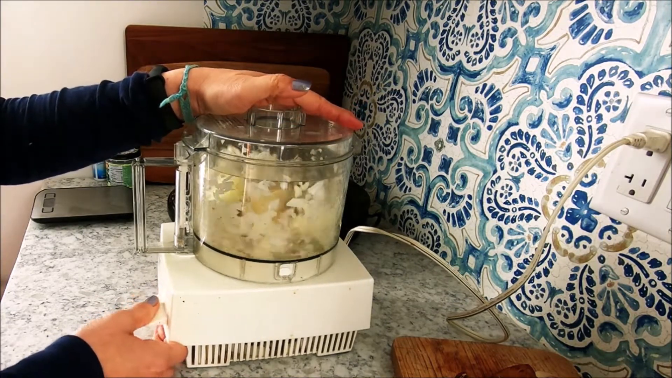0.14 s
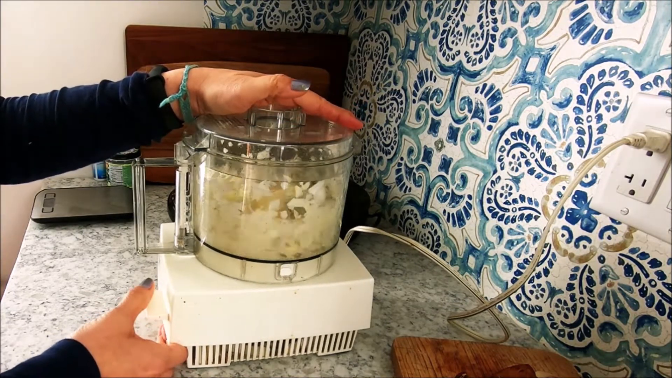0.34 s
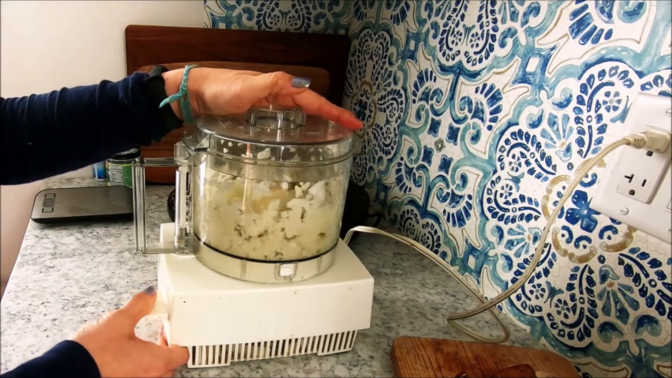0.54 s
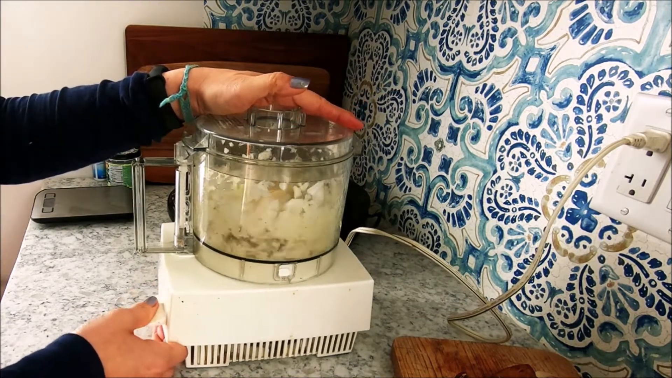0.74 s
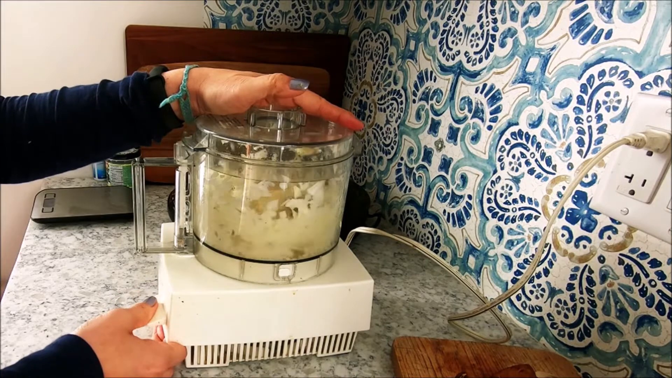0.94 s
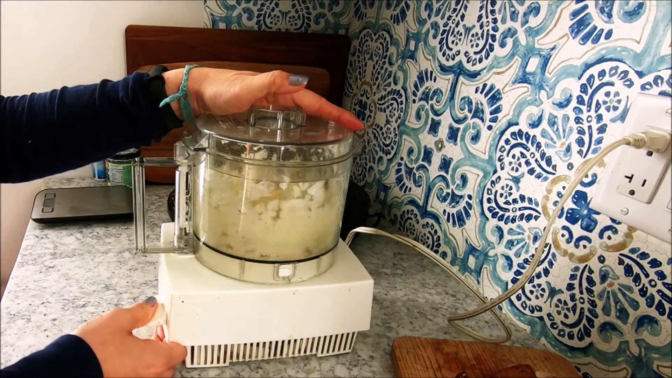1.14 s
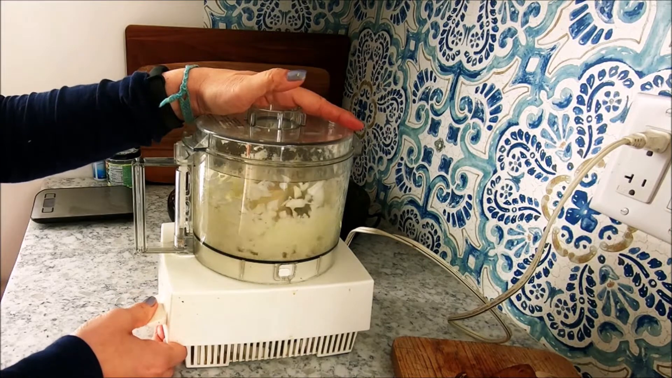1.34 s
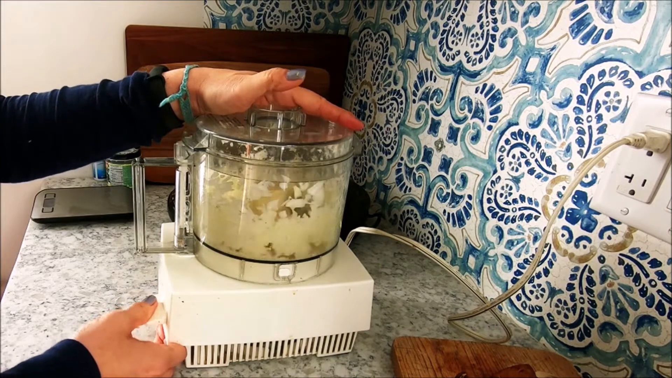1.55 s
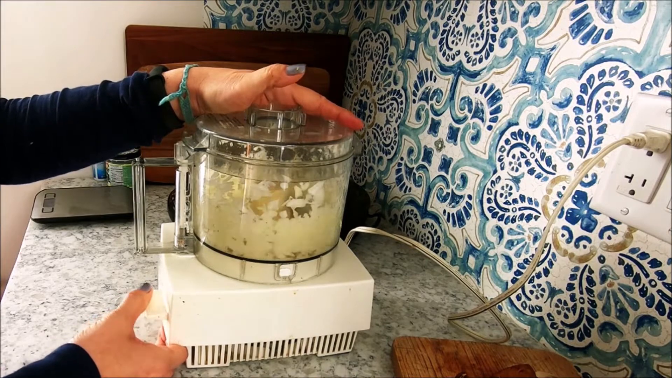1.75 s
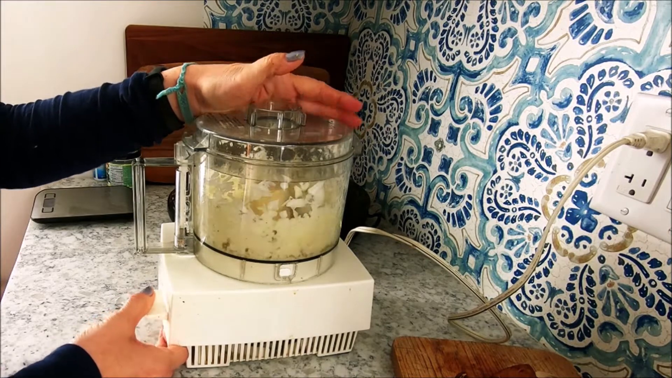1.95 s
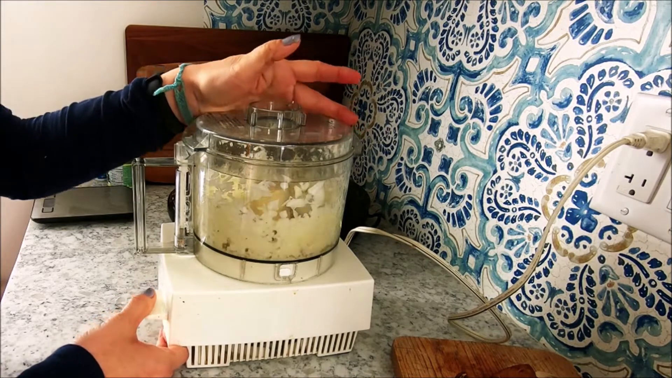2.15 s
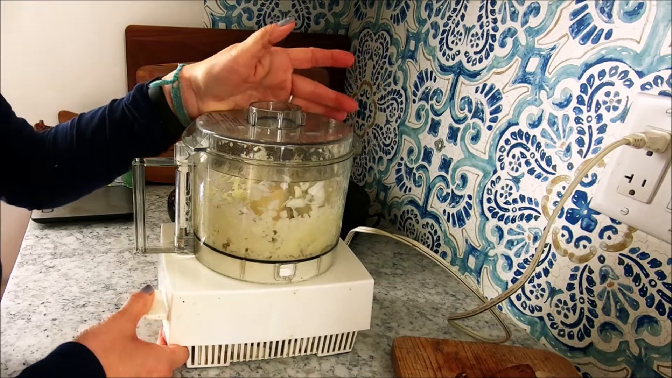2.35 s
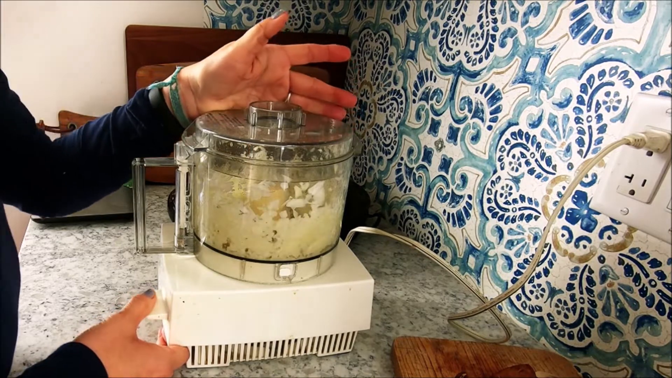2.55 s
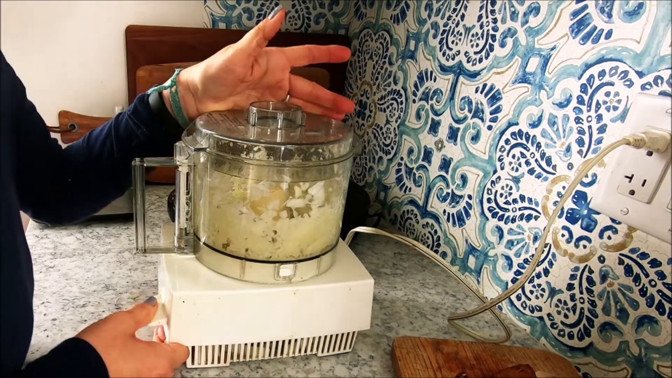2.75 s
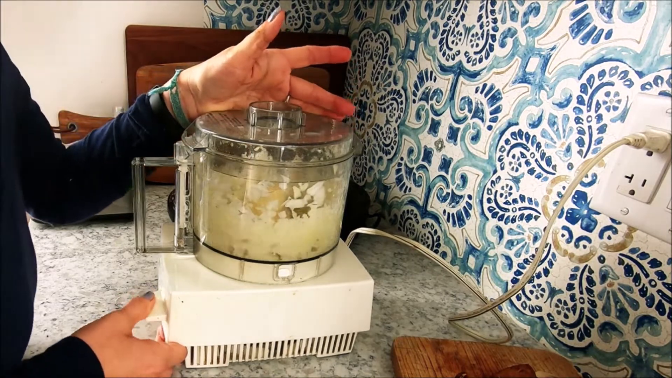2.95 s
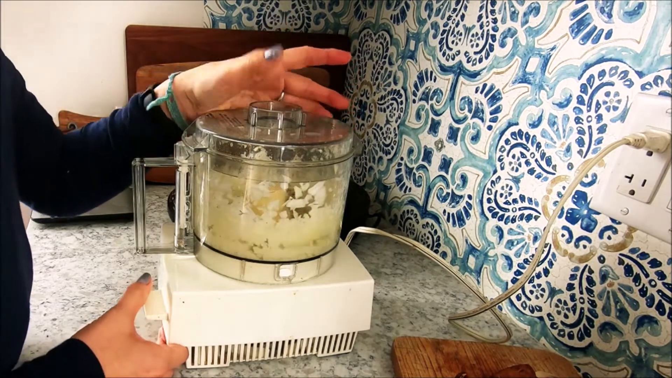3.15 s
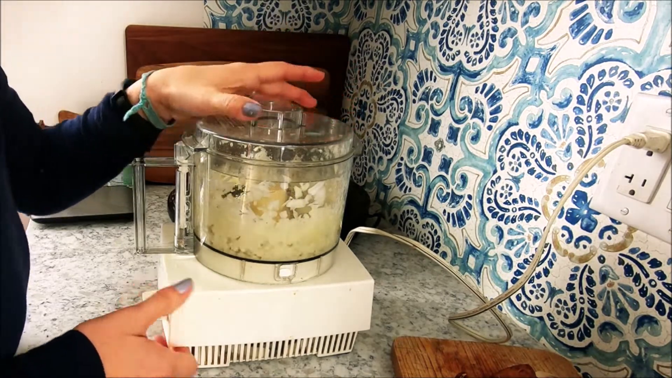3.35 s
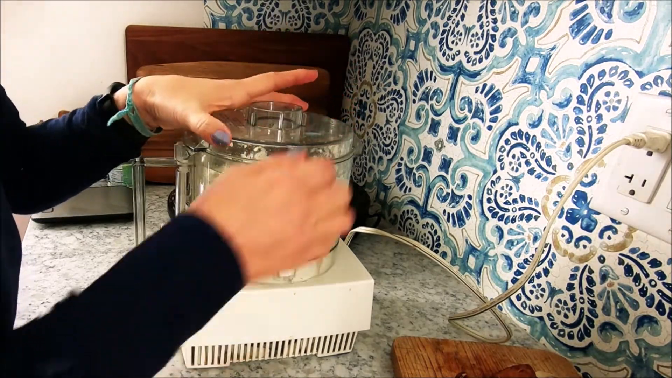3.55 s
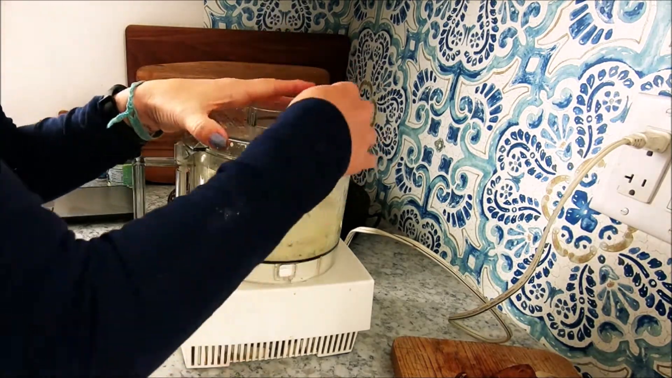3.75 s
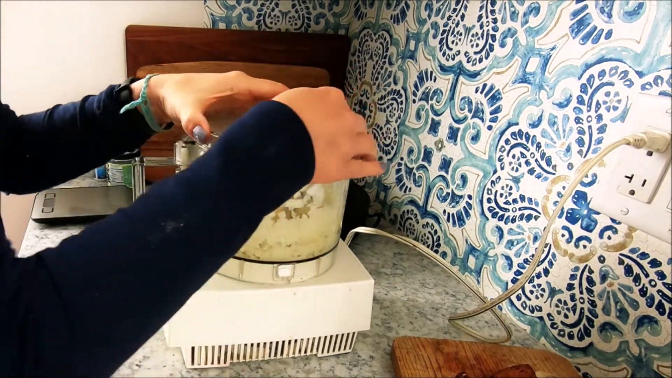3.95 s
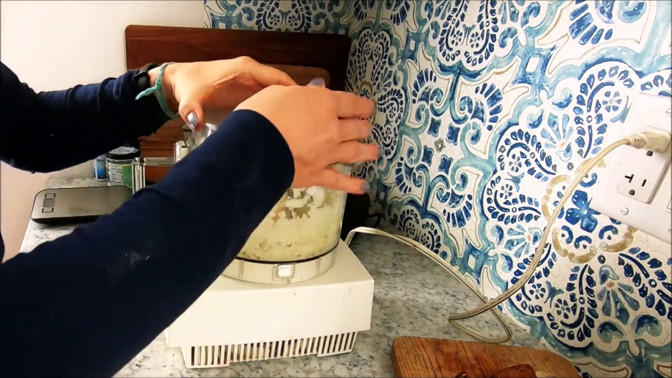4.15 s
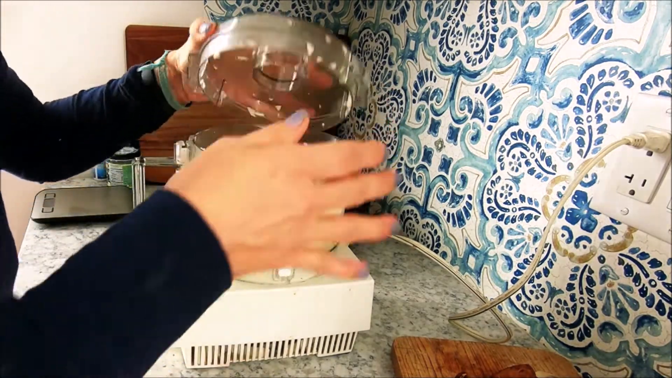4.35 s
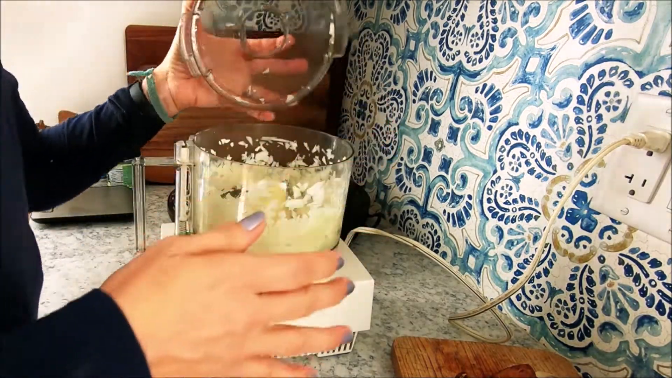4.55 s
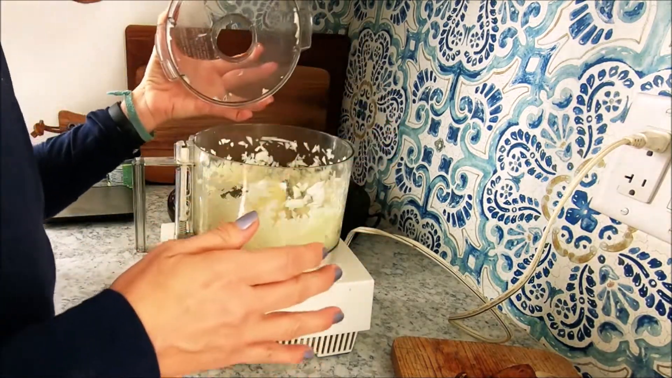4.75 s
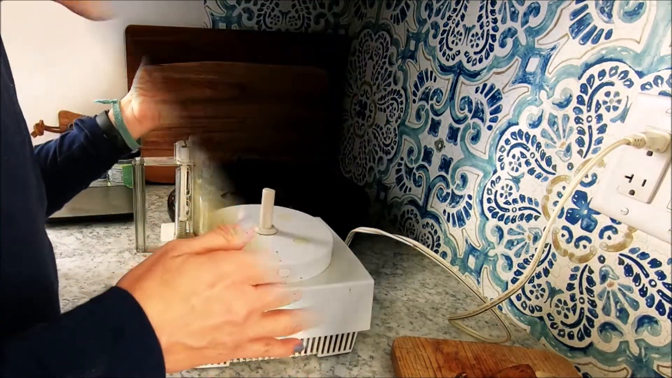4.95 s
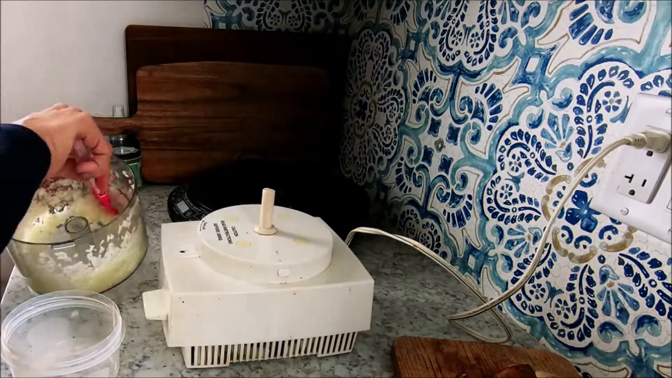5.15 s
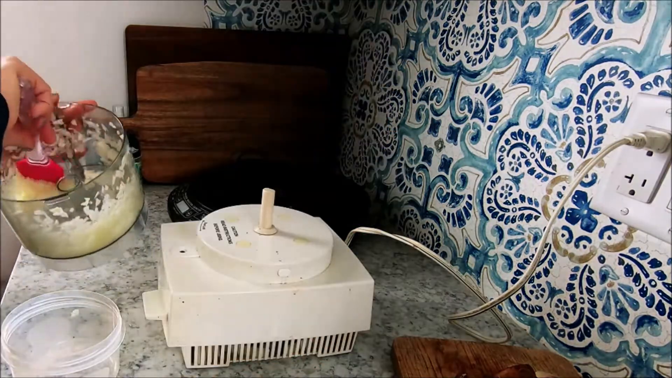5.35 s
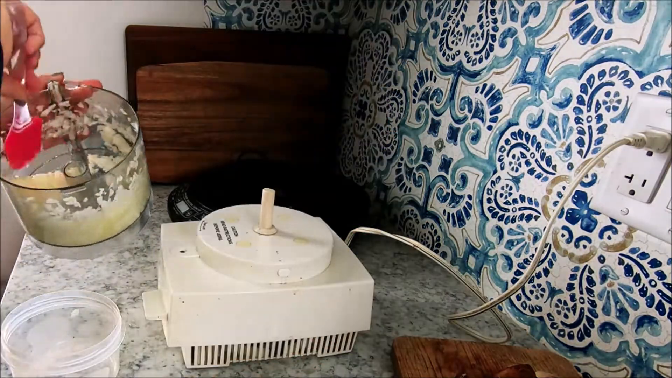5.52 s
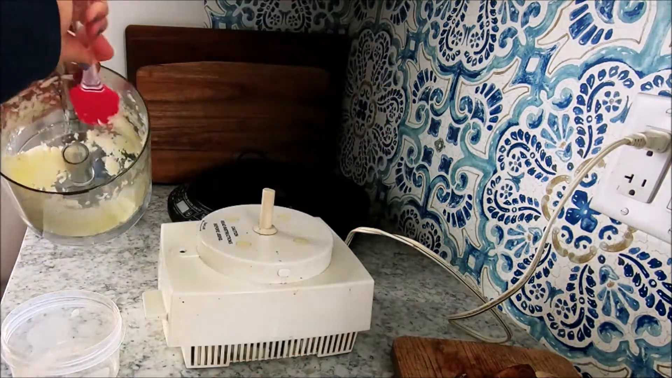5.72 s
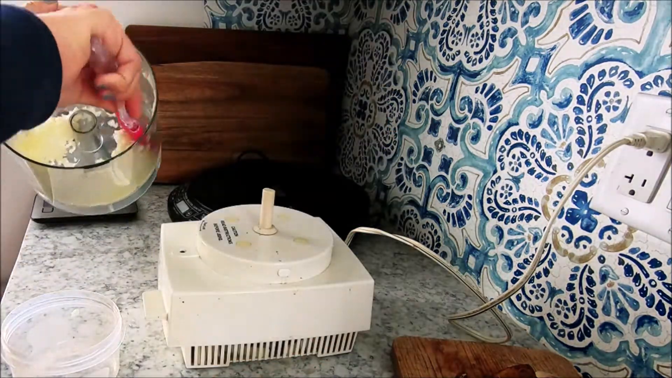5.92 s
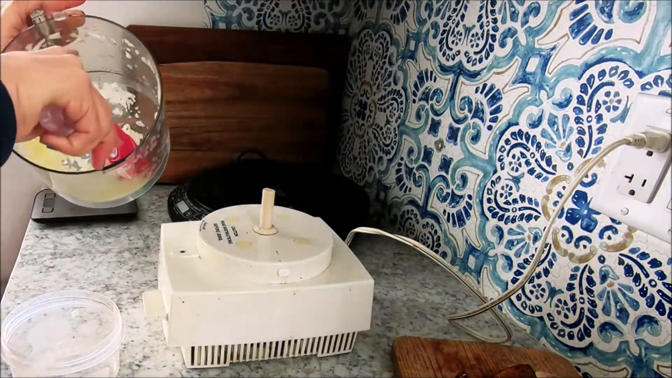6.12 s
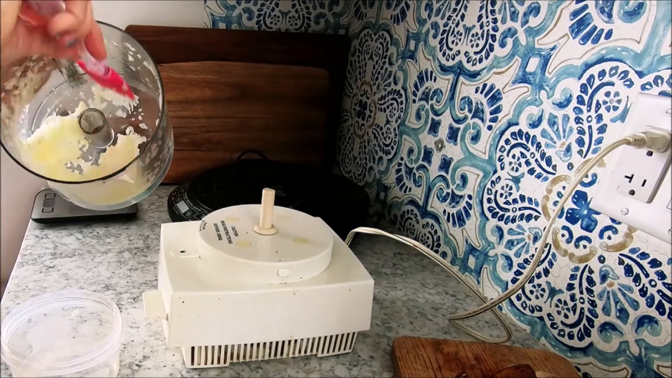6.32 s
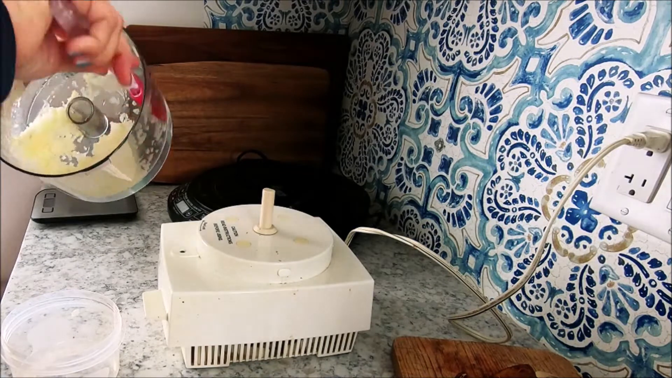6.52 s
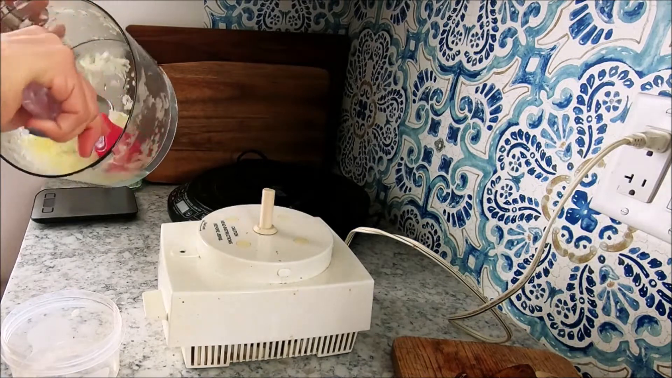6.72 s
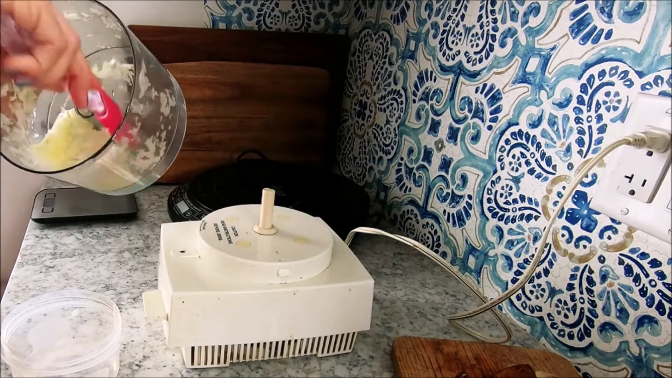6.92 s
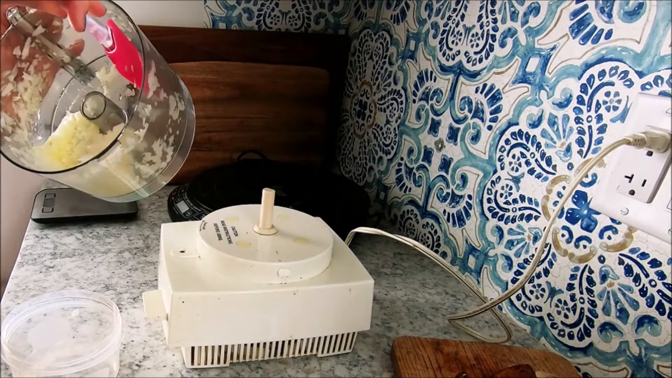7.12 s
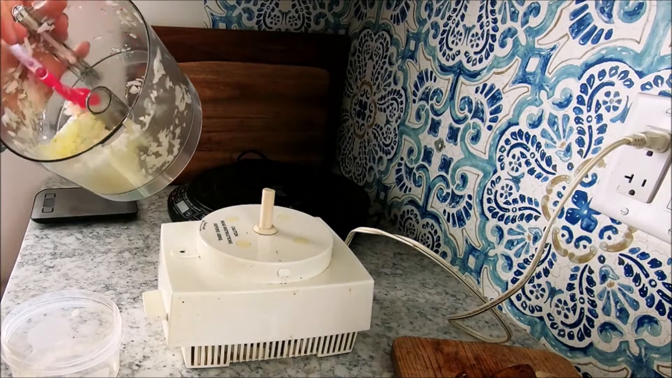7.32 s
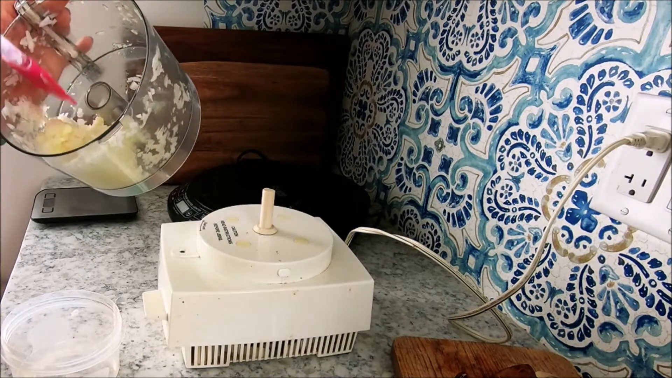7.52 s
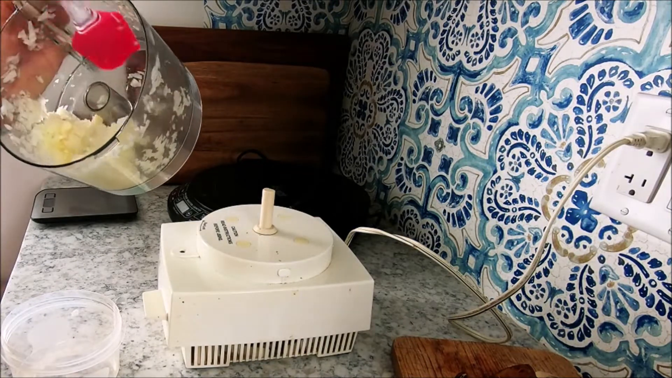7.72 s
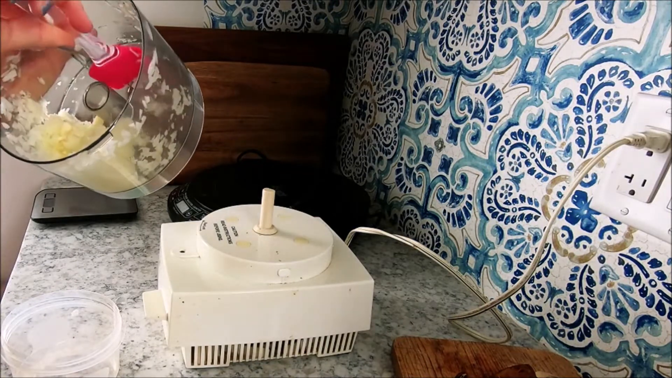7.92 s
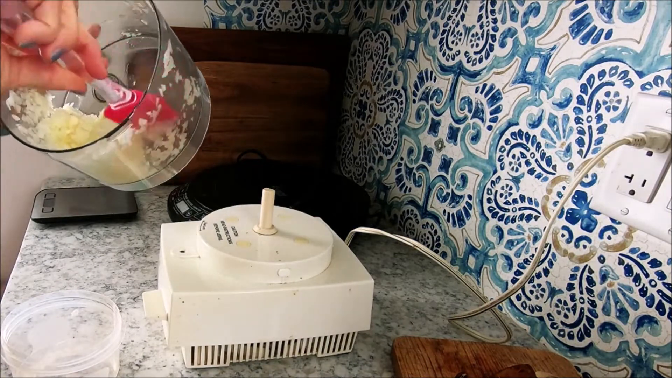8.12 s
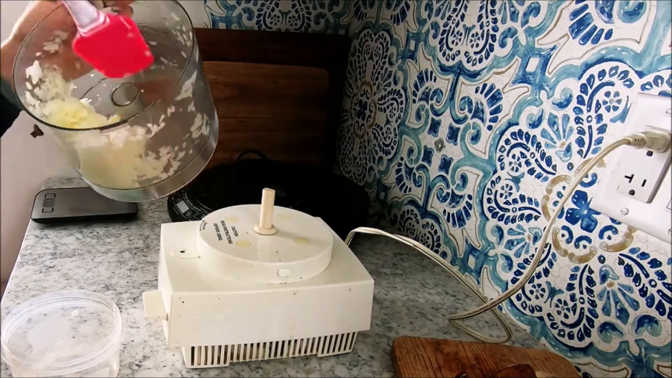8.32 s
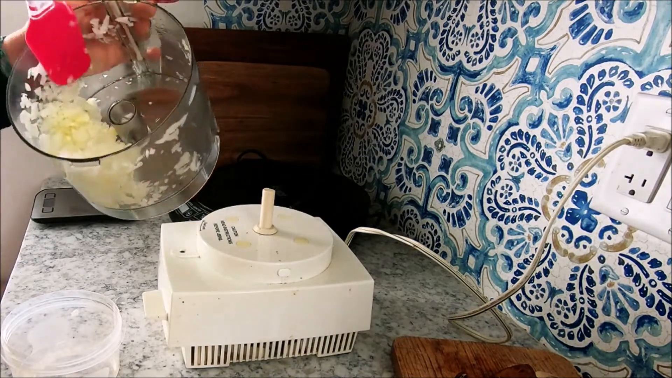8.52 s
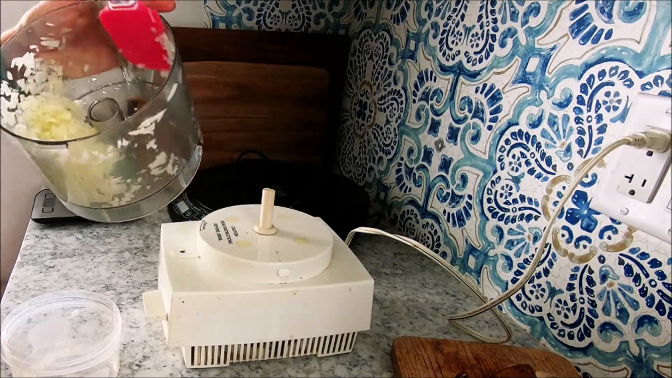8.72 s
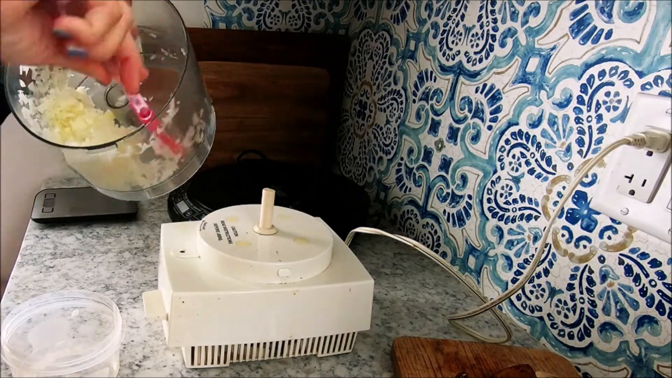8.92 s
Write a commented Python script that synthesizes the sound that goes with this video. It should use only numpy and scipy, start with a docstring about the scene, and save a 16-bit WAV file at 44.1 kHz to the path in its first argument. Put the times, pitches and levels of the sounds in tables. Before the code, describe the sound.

Three whirring bursts of a food processor with switch clicks, followed by a lid clack and light spatula scraping in a small kitchen.

```python
"""A switch clicks and a food processor kicks into the first of three pulses on a stone counter.
Each pulse: mains hum, housing rumble, vent whirr, food pelting the plastic bowl, then a coast-down.
The lid knocks as it is twisted off. A rubber spatula rubs and taps the bowl and squeaks by stick-slip.
Knocks and squeaks reverberate in a small hard kitchen, over a faint appliance hum."""
import sys
import numpy as np
from scipy import signal
from scipy.fft import rfft, irfft, next_fast_len
from scipy.io import wavfile
from scipy.ndimage import uniform_filter1d

SR = 44100
rng = np.random.default_rng(int(sys.argv[2]) if len(sys.argv) > 2 else 0)


def to_wav(s):
    """Save 16-bit WAV."""
    ch = np.atleast_2d(s).T  # columns
    pcm = np.round(np.clip(ch, -1, 1) * 32767)  # PCM
    wavfile.write(sys.argv[1], SR, pcm.astype(np.int16))


N = 399987

# Stereo image: freq_hz, left_right_likeness
LIKENESS = [(40, .3), (80, .6), (130, .7), (190, .98), (380, .98), (600, .55), (1100, .42), (2400, .72),
            (4500, .45), (8000, -.1)]
# Room noise spectrum: freq_hz, level_db
ROOM_TONE = [(12, -37.5), (20, -5.5), (111, -16), (132, -10), (217, -10), (300, -14), (350, -20),
             (693, -17), (1050, -24.5), (6720, -33.5), (15000, -53.5)]
# Room resonance: freq_hz, width_hz, boost_db
ROOM_PEAKS = [(216, 4.4, 3.5)]
# Appliance hum: pitch_hz, level_db
FRIDGE = [(215.3, -74), (269.2, -78.5), (306.8, -75.5), (344.5, -77)]
# Arms leaning on the counter: start_s, end_s, level_db
LEANS = [(0, 0.136, -45), (2.408, 2.628, -44), (3.495, 4.206, -50), (4.57, 4.795, -56), (4.954, 5.157, -59)]
# Blade edge drags that ring the bowl's hollow: start_s, end_s, level_db
HOLLOW_DRAGS = [(7.184, 7.5, -55), (7.8, 7.98, -57.5), (8.085, 8.314, -59.5)]
# Spectrum of the hollow: freq_hz, level_db
HOLLOW_RING = [(900, -34), (1020, -3.5), (1150, -3.5), (1300, -3.5), (1500, -33)]
# Hand brushing lid or bowl: start_s, level_db, t60_s
BRUSHES = [(0.095, -60, 0.6), (2.077, -54.5, 0.55), (2.19, -57.5, 0.69), (2.398, -55, 0.87),
           (3.65, -52, 1.4), (3.799, -57, 1.4), (3.968, -31, 0.41), (4.199, -51.5, 1.17),
           (7.264, -58, 1.56), (8.083, -69, 2)]
# Steady drags on the plastic: start_s, end_s, level_db
DRAGS = [(3.389, 3.482, -58.5), (4.877, 5.136, -61.5), (5.128, 6.17, -58), (6.477, 6.724, -63)]
# Last scrape: time_s, body_db, treble_db
SCRAPE = [(8.535, -71, -72.5), (8.7, -56, -37.5), (8.74, -54, -36.5), (8.83, -42, -46), (8.84, -36, -45),
          (8.93, -54, -48.5), (9.02, -59, -72), (9.035, -41.5, -58), (9.07, -45, -58)]
# Friction spectra: freq_hz, level_db
RUB_BODY = [(290, -56), (500, -12.5), (707, -17), (909, -13), (1460, -5.5), (1840, -7.5), (2140, -6),
            (5000, -16), (6500, -51.5), (11000, -120)]
RUB_TREBLE = [(2350, -11.5), (4000, -7.5), (5670, -8.5), (6400, -4), (7770, -6), (15000, -39.5)]
# Stick-slip of rubber or skin:
# start_s, length_s, first_hz, middle_hz, last_hz, level_db, roughness, tilt_db_per_harmonic
SQUEAKS = [(0.123, 0.009, 1600, 1600, 1600, -51, 0.9, -5), (0.723, 0.01, 1550, 1550, 1550, -53, 0.9, -7),
           (2.77, 0.01, 1550, 1550, 1550, -53, 0.9, -5), (3.417, 0.044, 1030, 1030, 1000, -49.5, 0.63, -13),
           (5.52, 0.016, 2400, 2200, 1900, -44, 0.43, 0.5),
           (6.032, 0.025, 1500, 1400, 1400, -52.5, 0.4, -6.5),
           (6.103, 0.03, 1250, 1250, 1040, -31.5, 0.07, -1),
           (6.134, 0.025, 1250, 1300, 1280, -34, 0.45, -3.5),
           (6.159, 0.046, 1100, 1050, 1250, -41, 0.55, 0), (6.714, 0.014, 1380, 1430, 1450, -34.5, 0.4, -3),
           (6.733, 0.0094, 1200, 1310, 1300, -34, 0.48, -2),
           (6.772, 0.037, 1270, 1330, 1300, -35, 0.52, -2),
           (6.805, 0.025, 1800, 1660, 1860, -41.5, 0.44, -0.5),
           (6.818, 0.029, 1400, 1430, 1370, -47, 0.65, 1), (8.7, 0.015, 3400, 3700, 3750, -31.5, 0.53, -22),
           (8.706, 0.022, 4800, 4400, 4750, -32, 0.58, -12),
           (8.721, 0.018, 3600, 2800, 3400, -30.5, 0.68, -1),
           (8.731, 0.016, 2460, 2200, 2200, -37, 0.5, -3), (8.746, 0.03, 2270, 2950, 3000, -33, 0.76, -4),
           (8.823, 0.035, 1050, 1000, 1000, -29.5, 0.45, -0.5),
           (8.845, 0.066, 1570, 1440, 1620, -24.5, 0.24, -17),
           (8.842, 0.032, 3000, 3020, 2900, -29, 0.7, -9), (8.906, 0.0156, 2450, 2550, 2500, -33, 0.4, 0)]
# Weight of squeak partials: freq_hz, level_db
SQUEAK_COLOUR = [(400, -24), (650, -3.5), (1300, -4), (2500, 6.5), (3800, -6), (5000, -7.5), (9000, -16),
                 (15000, -60)]
# Plastic and thud modes: pitch_hz, level_db, t60_ratio
PLASTIC_MODES = [(830, -6.5, 0.8), (1063, 2, 0.7), (1200, -6, 0.37), (1397, -9, 1.3), (1688, -5, 0.91),
                 (1964, 1, 0.84), (2200, -3, 0.33), (2730, 0, 0.4), (3080, 3.5, 0.27), (3490, -2.5, 0.61),
                 (4000, -11.5, 0.4), (4780, -3.5, 0.57)]
THUD_MODES = [(222.5, 4, 1.7), (306, 4, 1.2), (439, -2.5, 2.2), (105, 10, 1.5)]
# Spatula on bowl: start_s, level_db, tick_db, pitch_hz
TAPS = [(4.968, -42.5, -4, 2790), (5.142, -50, -6, 1770), (5.789, -36.5, -14, 2880), (5.845, -39, 9, 2900),
        (5.899, -47, -15, 3480), (6.515, -40, -5, 2840), (6.568, -41, -23, 2900), (7.193, -41.5, -47, 1000),
        (7.196, -43, -30, 2730), (7.304, -43.5, -25, 1750), (7.803, -47.5, -32.5, 1100),
        (7.889, -55, -7, 1145), (8.093, -39.5, 2, 4600), (8.35, -49.5, -36, 2130), (8.576, -36, -28, 3080),
        (8.626, -31, 3, 3080)]
# Lid twisted free and lifted: start_s, level_db, thud_db, pitch_hz, thud_hz
LID_KNOCKS = [(3.658, -44, -14, 3500, 250), (3.751, -35.5, -0.5, 1904, 207), (3.792, -21.5, 5, 1797, 234),
              (3.975, -6, -12.5, 2020, 239), (4.008, -28, 4.5, 1840, 222), (4.037, -23, -2, 1170, 213),
              (4.254, -30, -6.5, 2100, 310), (4.296, -24.5, -2, 2730, 428)]
# Blade hub on its shaft: start_s, level_db
HUB_KNOCKS = [(0.54, -30), (0.61, -36), (0.842, -14), (1.882, -19), (1.905, -27), (1.926, -30)]
# Knock timbres: thud_db, tick_db, pitch_hz, decay_s, thud_hz, focus_db_per_octave, rattle_db
HUB = (-22, -28, 1050, .08, 250, 9, -7)
CLICK = (-23, -5, 2800, .06, 245, 7, 3)
KICK = (-4.5, -14, 3000, .035, 255, 8, -2)
CLACK = (-6, -2, 3200, .035, 253, 7, -2)
# Motor pulses: click_s, kick_s, release_s, rest_s, kick_db, clack_db, base_coast_db_per_s
PULSES = [(0.162, 0.193, 0.357, 0.85, -4, -11, 90), (0.754, 0.7835, 1.665, 2.1, -4, -4.5, 72),
          (2.815, 2.851, 3.036, 3.47, -12, -3.5, 85)]
# Mains harmonics: pitch_hz, level_db
MAINS = [(120, 1.5), (240, -5.5), (360, -6.5)]
# Spectra of vents, housing and pelting food: freq_hz, level_db
WHIRR = [(2530, -19), (4300, -1.5), (5110, -8.5), (6690, -4.5), (7650, -3), (12400, -25.5), (14900, -36.5),
         (15600, -35.5)]
HOUSING = [(29, -48.5), (50, -10), (75, -12.5), (118, -3.5), (150, -10), (228, -9.5), (378, -8), (430, -2),
           (540, -28), (730, -53.5), (1230, -120)]
CHOPPING = [(290, -40.5), (500, -10.5), (656, -11.5), (904, -10), (1200, -10), (1410, -10.5), (1790, -4),
            (2540, -4.5), (3790, -1.5), (4640, -19), (5500, -14.5), (7150, -43.5), (12100, -120)]
# Bowl resonances: freq_hz, width_hz, boost_db
BOWL_PEAKS = [(946, 530, 7.5), (1398, 68, 7.5), (1530, 63, 7.5), (2070, 51, 1.5), (2306, 100, 4.5),
              (2600, 120, 4), (3033, 100, 2.5)]

LEAD_S = .022  # current flows before the drive kicks in
TIME_S = np.arange(N) / SR


def from_db(db):
    """Decibels to gain."""
    return 10 ** (np.asarray(db, float) / 20)


def rms_one(x):
    """Scale to unit rms."""
    return x / np.sqrt(np.mean(x ** 2) + 1e-20)


def butter(x, order, hz, kind):
    """Butterworth filter."""
    return signal.sosfilt(signal.butter(order, hz, kind, fs=SR, output="sos"), x)


def at_hz(points, hz, outside=None):
    """Read a curve on a log-frequency axis."""
    knots_hz, values = np.transpose(points)
    return np.interp(np.log(hz + 1e-9), np.log(knots_hz), values, outside, outside)


def drift(rate_hz):
    """Slow random wander, unit rms."""
    pole = np.exp(-80 * np.pi * rate_hz / SR)
    slow = signal.lfilter([1], [1, -2 * pole, pole * pole], rng.standard_normal(N // 40 + 2002))[2000:]
    return np.interp(np.arange(N) / 40, np.arange(len(slow)), rms_one(slow))


def smooth_noise(shape, samples):
    """Twice-averaged noise, unit rms."""
    return rms_one(uniform_filter1d(uniform_filter1d(rng.standard_normal(shape), samples), samples))


def grains(per_s, spread_db):
    """Two independent streams of uneven random clicks."""
    size = from_db(spread_db * np.minimum(rng.exponential(1, (2, N)), 4)) * rng.standard_normal((2, N))
    return rms_one(size * (rng.random((2, N)) < per_s / SR))


def coloured(pair, spectrum, peaks=(), width=.87):
    """Mid/side excitation through a spectrum and resonances to left/right, unit rms."""
    hz = np.fft.rfftfreq(N, 1 / SR)
    gain = from_db(at_hz(spectrum, hz, outside=-120))
    for peak_hz, width_hz, boost_db in peaks:
        gain *= 1 + (from_db(boost_db) - 1) / (1 + (2 * (hz - peak_hz) / width_hz) ** 2)
    alike = np.clip(1 - width * (1 - at_hz(LIKENESS, hz)), -.2, .99)
    mid, side = rfft(pair) * gain
    return rms_one(irfft(np.sqrt(1 + alike) * mid + np.sqrt(1 - alike) * side * [[1], [-1]], N))


def room_tone():
    """Faint room noise and a steady appliance hum."""
    air = from_db(-62.5) * coloured(rng.standard_normal((2, N)), ROOM_TONE, ROOM_PEAKS, width=3.4)
    fridge = sum(from_db(db + drift(2)) * np.sin(2 * np.pi * hz * TIME_S) for hz, db in FRIDGE)
    return air + np.sqrt(2) * fridge


def kitchen(x, t60_s=.44, wall_cut_hz=600):
    """Wall echoes: fourteen feedback delays a side, duller each round."""
    size = next_fast_len(N + SR)
    hz = np.fft.rfftfreq(size, 1 / SR)
    dull = 1 / (1 + (hz / wall_cut_hz) ** 2) ** .072
    source, out = rfft(x, size), []
    for lags_s in (rng.uniform(.014, .045, (2, 14)) * SR).astype(int) / SR:
        loops = [from_db(-60 * lag / t60_s) * dull * np.exp(-2j * np.pi * hz * lag) for lag in lags_s]
        response = sum((-1) ** k * g / (1 - g) for k, g in enumerate(loops))  # signs prevent pile-up
        out.append(irfft(source * response, size)[:N])
    return np.array(out)


def counter_shake(level_db=-40, rise_s=.19, settle_s=.295):
    """The counter wobbles under the turning blade and leaning arms."""
    t = TIME_S
    mid, side = rms_one(butter(rng.standard_normal((2, N)), 2, [14, 36], "band"))
    gain = from_db(level_db) * sum(np.clip((t - kick_s) / rise_s, 0, 1) * (t < release_s + settle_s)
                                   for _, kick_s, release_s, *_ in PULSES)
    gain += sum(from_db(db) * (t >= start_s) * (t < end_s) for start_s, end_s, db in LEANS)
    return uniform_filter1d(gain, 2000) * (mid + .8 * side * [[1], [-1]]) * from_db([[-.8], [.8]])


def bowl_hollow(fall_db=15):
    """Uneven friction rings the bowl's air and wall near one pitch."""
    t = TIME_S
    gain = sum((t > start_s) * (t < end_s) * from_db(db - fall_db * (t - start_s) / (end_s - start_s))
               for start_s, end_s, db in HOLLOW_DRAGS)
    gain = uniform_filter1d(gain, 400) * from_db(1.7 * drift(25.5))
    return gain * coloured(grains(2000, spread_db=.5), HOLLOW_RING)


def rubbing(lift_t60_s=.6):
    """Skin and rubber drag over wet plastic: grainy hiss, with crumbs catching."""
    t = TIME_S
    times_s, *bands_db = np.transpose(SCRAPE)
    gains = (t > times_s[0]) * from_db([np.interp(t, times_s, db) for db in bands_db])  # body, treble
    for start_s, db, t60_s in BRUSHES:
        gains += (t > start_s) * from_db(db - 60 * np.maximum(t - start_s, 0) / t60_s + [[0], [-9]])
    for start_s, end_s, db in DRAGS:
        gains += (t > start_s) * from_db(db - 60 * np.maximum(t - end_s, 0) / lift_t60_s + [[0], [-3]])
    gains = uniform_filter1d(gains, 200) * from_db(1.7 * drift(28))
    friction = grains(5000, spread_db=-1.5)
    crumbs = from_db(-24.5) * grains(40.6, spread_db=6)
    body = coloured(friction + crumbs, RUB_BODY, width=1.4)
    treble = coloured(grains(20000, spread_db=-.7), RUB_TREBLE)
    return gains[0] * body + gains[1] * treble


def squeaks(grip_s=.0028, release_db_per_length=28, pairing_below_hz=1400):
    """Stick-slip: harmonics of the slip rate. Uneven slips rasp; strong-weak pairs add half orders."""
    out, t = np.zeros(N + SR), np.arange(SR // 5) / SR
    halves = np.arange(1, 17)[:, None]
    order = halves / 2
    for start_s, length_s, first_hz, middle_hz, last_hz, db, rough, tilt_db in SQUEAKS:
        slip_hz = np.interp(t, [0, length_s / 2, length_s], [first_hz, middle_hz, last_hz])
        release_db = release_db_per_length * np.maximum(t / length_s - 1, 0)
        level = np.minimum(t / grip_s, 1) * from_db(db - release_db)
        grip = from_db(3 * rough * smooth_noise(len(t), 300))
        jitter = smooth_noise((17, len(t)), 45)
        phase = 2 * np.pi * np.cumsum(slip_hz * (1 + .09 * rough ** 2 * jitter[16])) / SR
        weight_db = at_hz(SQUEAK_COLOUR, order * slip_hz) + tilt_db * np.maximum(order - 1, 0)
        pairing = 1.6 * max(rough - .25, 0) * (middle_hz < pairing_below_hz)
        weights = from_db(weight_db) * np.where(halves % 2, pairing, 1) * (order * slip_hz < .45 * SR)
        blur = rough ** (1 / order)  # high partials blur first
        rasp = np.sqrt(1 - blur ** 2) + blur * jitter[:16]
        tone = (weights * rasp * np.cos(order * phase + halves ** 2)).sum(axis=0)
        tone /= np.sqrt((weights ** 2).sum(axis=0) / 2)
        at = round(start_s * SR)
        out[at:at + len(t)] += level * grip * tone
    return out[:N]


def knock(thud_db, tick_db, pitch_hz, decay_s, thud_hz, focus_db_per_octave, rattle_db):
    """A blow rings the plastic modes near its pitch, with rattle, low thud and bright tick."""
    t = np.arange(SR // 4) / SR
    scatter, noise = rng.standard_normal((2, 16, 1)), rng.standard_normal((3, len(t)))
    hz, db, t60_ratio = np.transpose(PLASTIC_MODES + THUD_MODES)[:, :, None]
    modes = from_db(db + 2.5 * scatter[0] - 60 * t / (t60_ratio * min(decay_s, .06)))
    modes *= np.sin(2 * np.pi * hz * (1 + .017 * scatter[1]) * t)
    split = len(PLASTIC_MODES)
    ring = (modes * from_db(-focus_db_per_octave * np.abs(np.log2(hz / pitch_hz))))[:split].sum(axis=0)
    ring *= 1 + .35 * rms_one(uniform_filter1d(noise[2], 90))  # loose parts buzz
    thud = (modes * from_db(-16 * np.abs(np.log2(hz / thud_hz))))[split:].sum(axis=0)
    thud *= from_db(thud_db) * (1 - np.exp(-t / .003))
    thud *= 1 + .35 * rms_one(uniform_filter1d(noise[1], 300))  # roughened to a dry clunk
    band_hz = pitch_hz * 2 ** (np.array([-11, 11]) / max(focus_db_per_octave, 8))
    rattle = rms_one(butter(noise[0], 2, band_hz, "band"))
    rattle *= from_db(rattle_db - 60 * t / (.52 * decay_s))
    tick = butter(noise[1], 4, [4000, 9000], "band") * from_db(tick_db - 60 * t / (.12 * decay_s))
    share = 1 / (1 + 2 * from_db(rattle_db))  # more rattle, less ring
    contact = 1 - np.exp(-t / .00069)  # soft surfaces load up
    return contact * (share * (2.8 * ring / np.abs(ring).max() + rattle + tick) + thud)


def knocks(click_db=-14.5, bounce_s=.022, bounce_db=-9):
    """Plastic contacts of hub, switch, drive, lid and spatula. The released switch rebounds once."""
    blows = [(s, db, knock(*HUB)) for s, db in HUB_KNOCKS]
    for click_s, kick_s, release_s, _, kick_db, clack_db, _ in PULSES:
        blows += [(click_s, click_db, knock(*CLICK)),
                  (kick_s, kick_db, knock(*KICK)),
                  (release_s, clack_db, knock(*CLACK)),
                  (release_s + bounce_s, clack_db + bounce_db, knock(*CLACK))]
    for s, db, thud_db, pitch_hz, thud_hz in LID_KNOCKS:
        blows.append((s, db, knock(thud_db, tick_db=-22, pitch_hz=pitch_hz, decay_s=.05,
                                   thud_hz=thud_hz, focus_db_per_octave=10, rattle_db=-8)))
    for s, db, tick_db, pitch_hz in TAPS:
        blows.append((s, db, knock(thud_db=-46, tick_db=tick_db, pitch_hz=pitch_hz, decay_s=.25,
                                   thud_hz=250, focus_db_per_octave=33, rattle_db=-8)))
    out = np.zeros(N + SR)
    for start_s, db, blow in blows:
        at = round(start_s * SR)
        out[at:at + len(blow)] += from_db(db) * blow
    return butter(out[:N], 2, 8000, "low")


def mains_hum(level_db=-36, rise_s=.087, fall_s=.0077):
    """The windings buzz at mains harmonics while the switch is held."""
    t = TIME_S
    buzz = sum(from_db(db + 1.3 * drift(26)) * np.sin(2 * np.pi * hz * t + .63 * drift(8.7))
               for hz, db in MAINS)
    held = sum(np.clip((t - kick_s + LEAD_S) / rise_s, 0, 1)
               * np.clip((release_s + .0071 - t) / fall_s, 0, 1) for _, kick_s, release_s, *_ in PULSES)
    return np.sqrt(2) * from_db(level_db) * held * buzz


def chunks(per_s=1100, width_hz=130):
    """Larger pieces hit the wall, each ringing one bowl resonance."""
    blows = grains(per_s, spread_db=.5)
    struck = rng.integers(0, len(BOWL_PEAKS), N)
    return rms_one(sum(signal.lfilter(*signal.iirpeak(hz, hz / width_hz, SR), blows * (struck == k) + 1e-18)
                       for k, (hz, *_) in enumerate(BOWL_PEAKS)))


def drive(spin_up_s=.018, coast_s=.35):
    """Torque jolt, twist at release, coast-down: chop, housing and whirr gains, and shaft speed ratio."""
    t = TIME_S
    chop, housing, whirr = np.zeros((3, N))
    speed = np.ones(N)
    for _, kick_s, release_s, rest_s, _, _, coast_db_per_s in PULSES:
        spin_up = 1 - np.exp(-np.maximum(t - kick_s + LEAD_S, 0) / spin_up_s)
        bite = np.clip((t - kick_s) / .0074 + 1, 0, 1)
        coasted_s = np.maximum(t - release_s, 0)
        fade_db = -coast_db_per_s * coasted_s
        halt = np.clip((rest_s - t) / .15, 0, 1)  # friction stops the blade
        speed = np.where(t > kick_s - .1, np.exp(-coasted_s / coast_s), speed)
        jolt_db = np.where(t < kick_s - .002, -4, 6.5 * np.exp(-np.abs(t - kick_s) / .02))
        twist_db = 7 * (t > release_s - .004) * np.exp(-np.abs(t - release_s) / .027)
        chop += from_db(1.064 * fade_db + jolt_db + .42 * twist_db) * spin_up ** .2 * halt
        housing += from_db(.95 * fade_db + jolt_db + twist_db) * bite * halt
        whirr += from_db(1.15 * fade_db) * spin_up ** 2.4 * halt
    return chop, housing, whirr, speed


def motor(shaft_hz=29.96, chop_db=-26, housing_db=-25, whirr_db=-34.5):
    """Food pelts the bowl twice a turn, the housing rumbles, the vents whirr."""
    chop_gain, housing_gain, whirr_gain, speed = drive()
    turns = np.cumsum(shaft_hz * speed * (1 + .003 * drift(3))) / SR
    beat = from_db(.8 * np.sin(4 * np.pi * turns) + .7 * drift(16))
    repeating = rng.standard_normal((2, 1500))[:, (turns % 1 * 1500).astype(int)]  # same blows each turn
    pelting = grains(5000, spread_db=-.5) + from_db(-9) * chunks() + from_db(-3) * repeating
    chop = coloured(pelting, CHOPPING, BOWL_PEAKS) * beat
    shaking = grains(900, spread_db=-.5) + from_db(-1) * repeating
    housing = coloured(shaking, HOUSING) * from_db(1.6 * drift(57))
    whirr = coloured(grains(20000, spread_db=.5), WHIRR) * beat ** 1.1
    return (from_db(chop_db) * chop_gain * chop + from_db(housing_db) * housing_gain * housing
            + from_db(whirr_db) * whirr_gain * whirr)


def scene():
    """Stereo mix; knocks and squeaks feed the reverb."""
    hits, rubber = knocks(), squeaks()
    airborne = butter(hits, 4, 480, "high")  # the thud stays in the counter
    room = kitchen(from_db(-11) * airborne + from_db(-11.5) * rubber) + room_tone()
    machine = (motor() + mains_hum() + hits) * from_db([[-.4], [.4]])
    handling = rubber * from_db([[.6], [-.6]]) + rubbing() + bowl_hollow()
    return room + counter_shake() + handling + machine


def record(dry):
    """Steep low-pass, 60 dB down from 15.8 kHz."""
    return signal.sosfilt(signal.cheby2(20, 60, 15800, fs=SR, output="sos"), dry)


dry = scene()
out = record(dry)
to_wav(out)
```